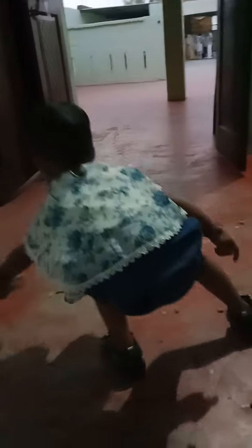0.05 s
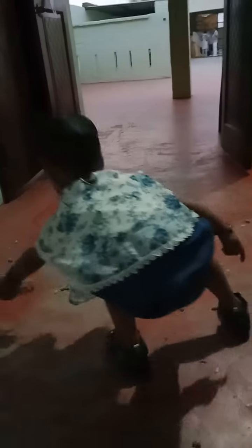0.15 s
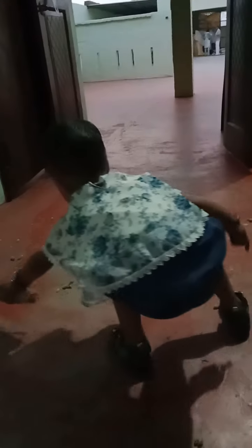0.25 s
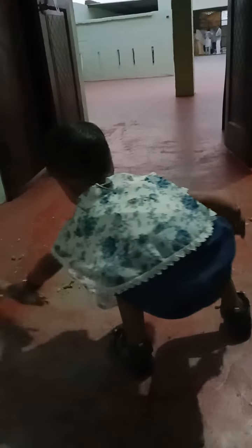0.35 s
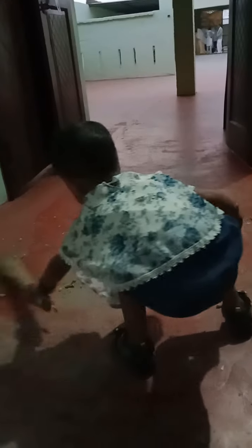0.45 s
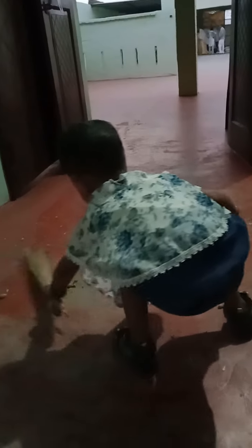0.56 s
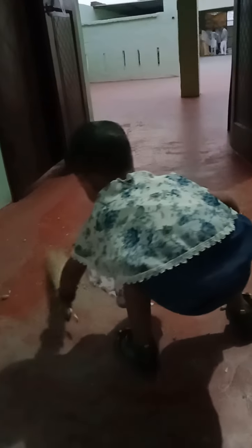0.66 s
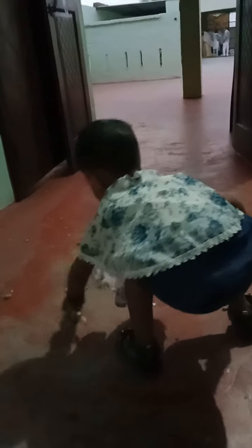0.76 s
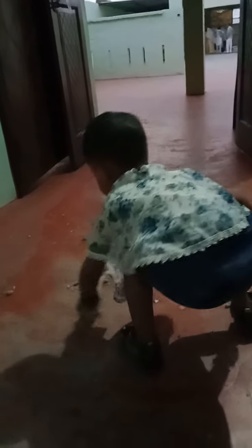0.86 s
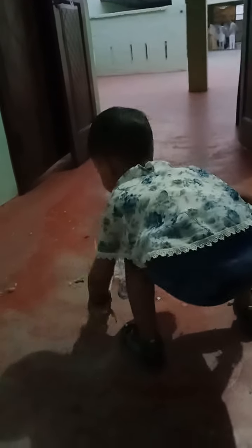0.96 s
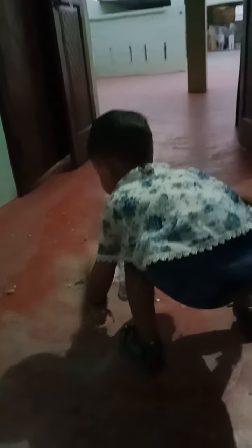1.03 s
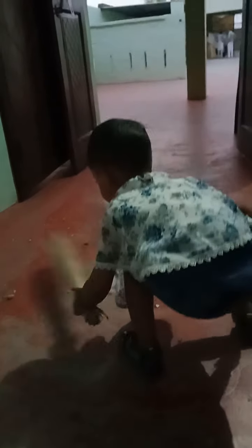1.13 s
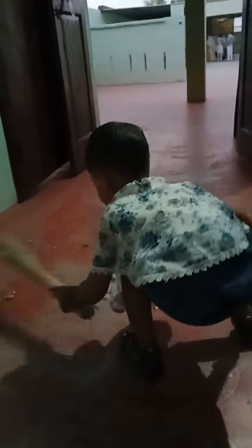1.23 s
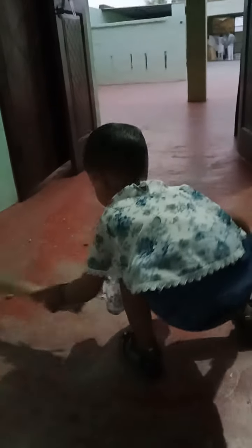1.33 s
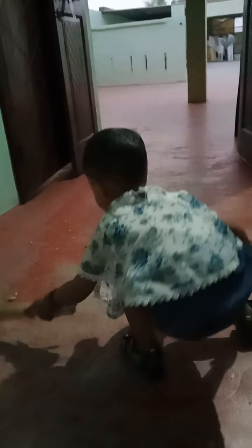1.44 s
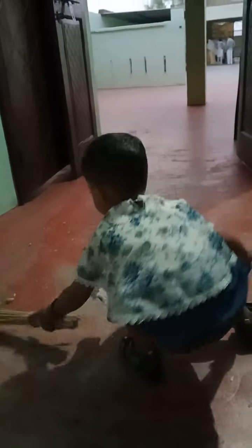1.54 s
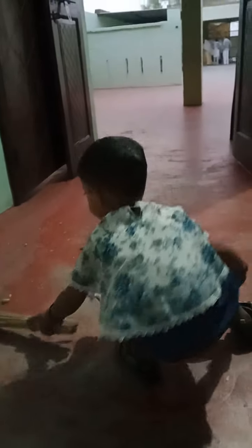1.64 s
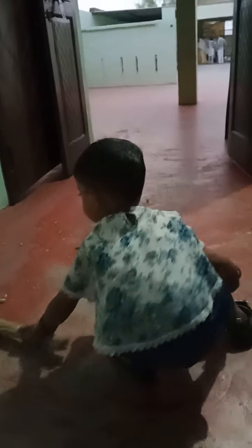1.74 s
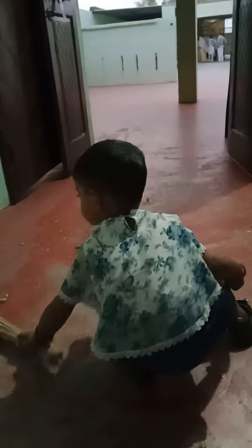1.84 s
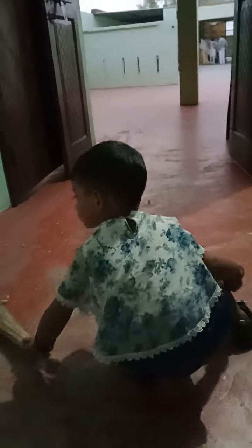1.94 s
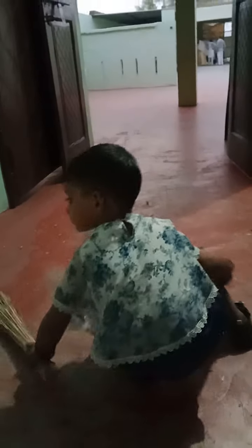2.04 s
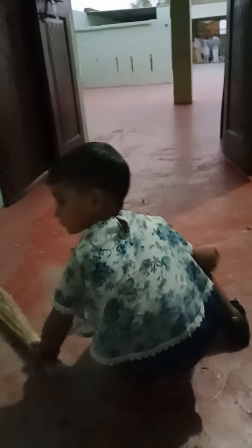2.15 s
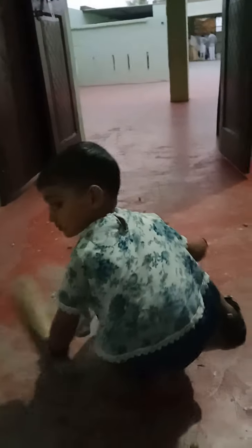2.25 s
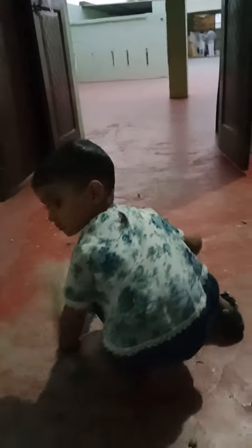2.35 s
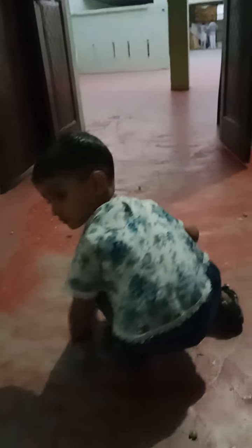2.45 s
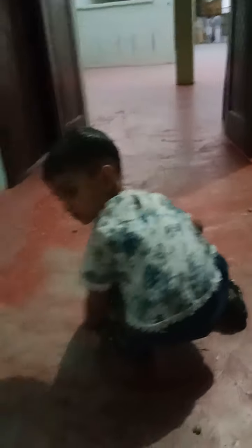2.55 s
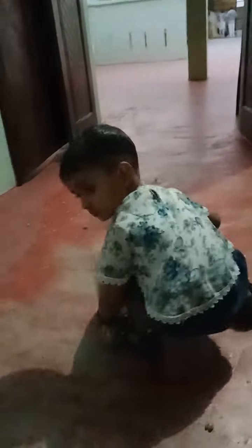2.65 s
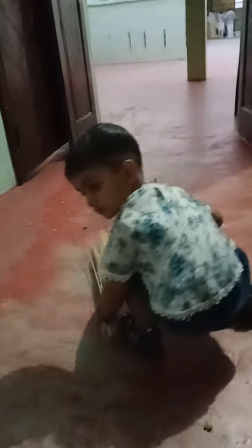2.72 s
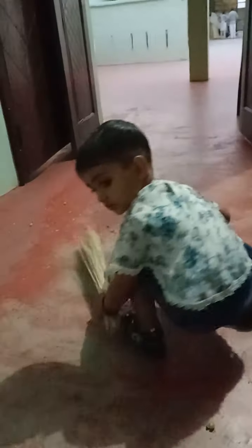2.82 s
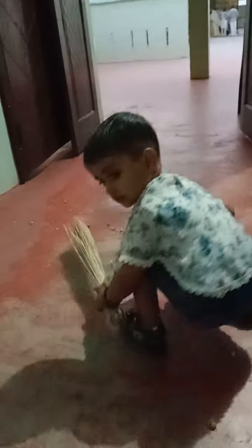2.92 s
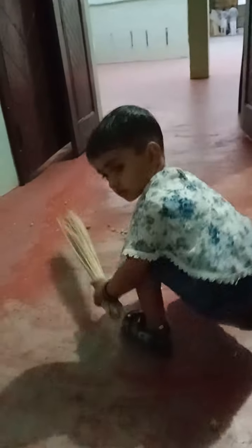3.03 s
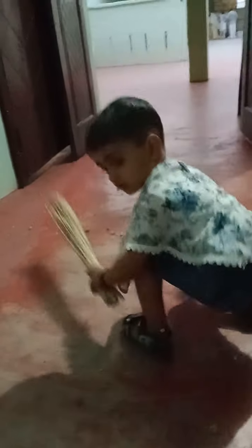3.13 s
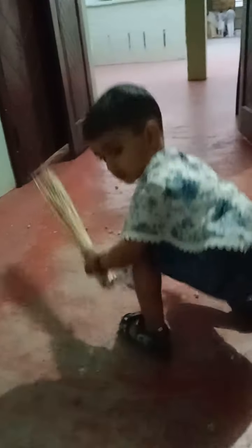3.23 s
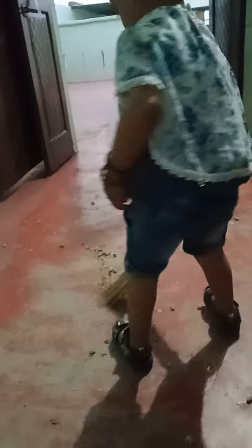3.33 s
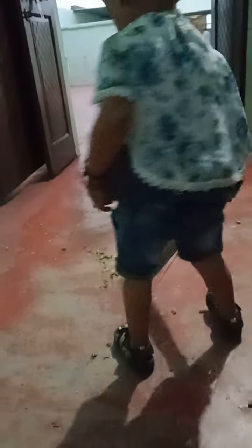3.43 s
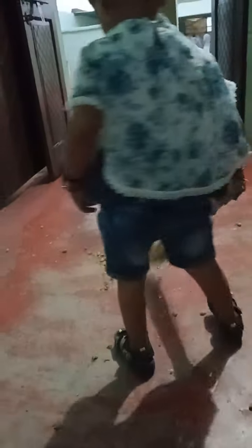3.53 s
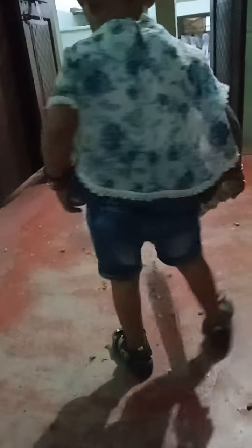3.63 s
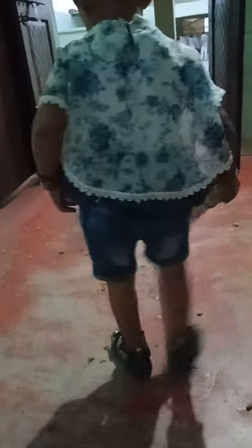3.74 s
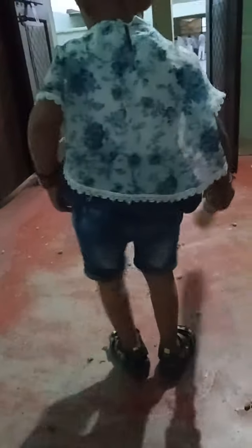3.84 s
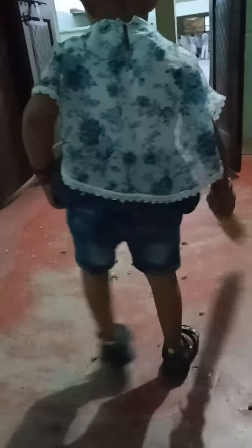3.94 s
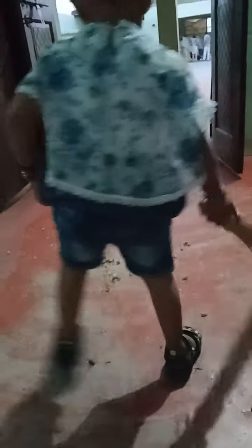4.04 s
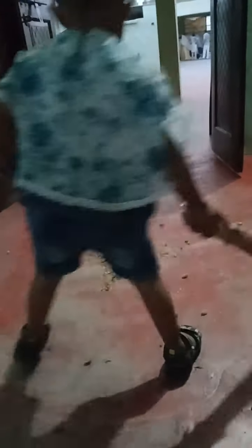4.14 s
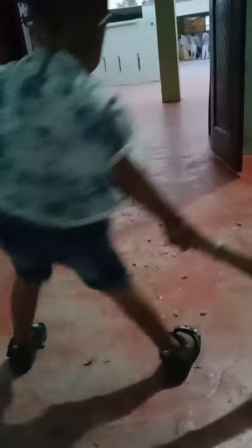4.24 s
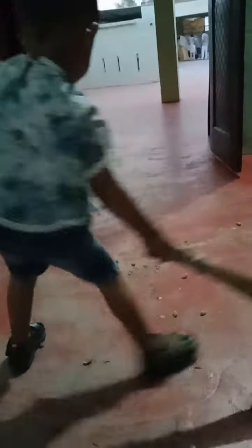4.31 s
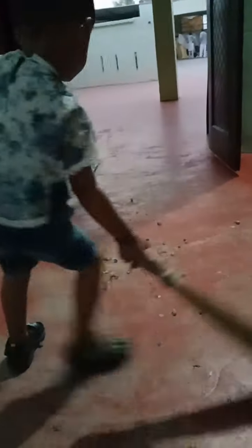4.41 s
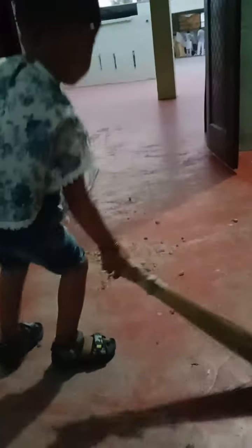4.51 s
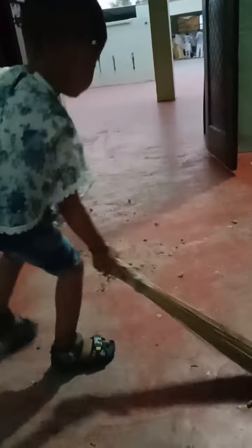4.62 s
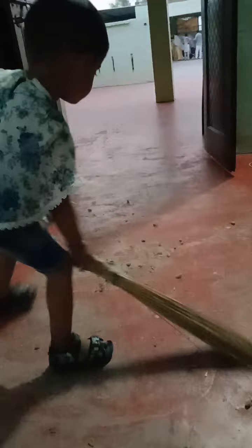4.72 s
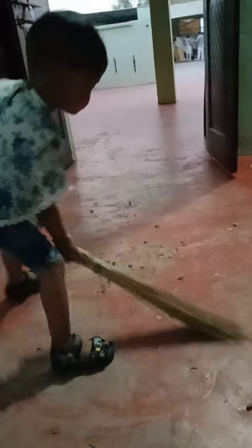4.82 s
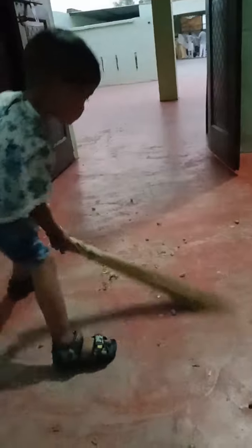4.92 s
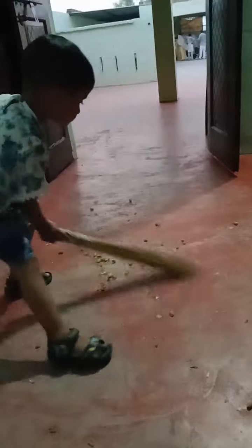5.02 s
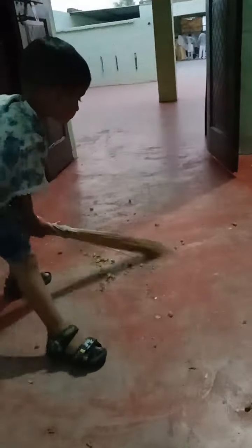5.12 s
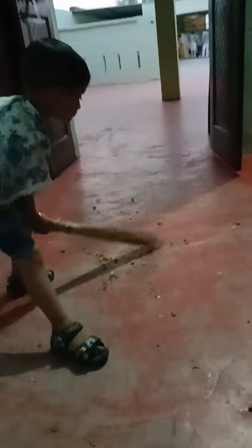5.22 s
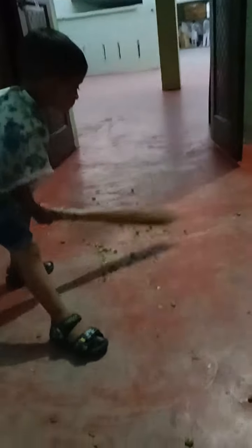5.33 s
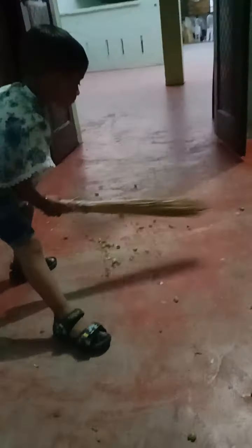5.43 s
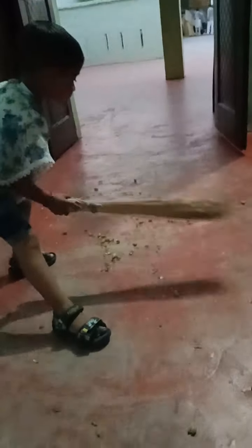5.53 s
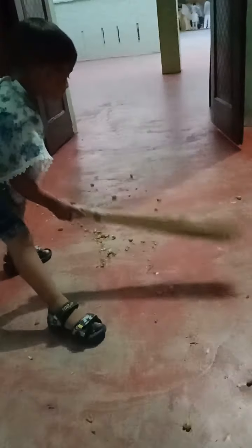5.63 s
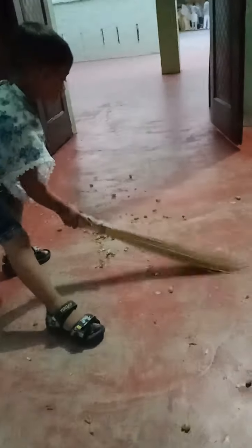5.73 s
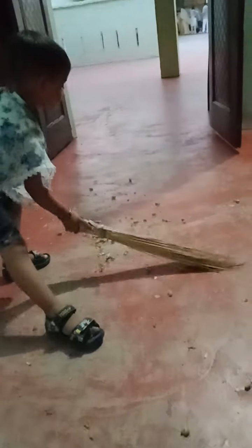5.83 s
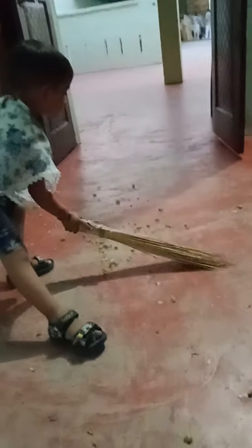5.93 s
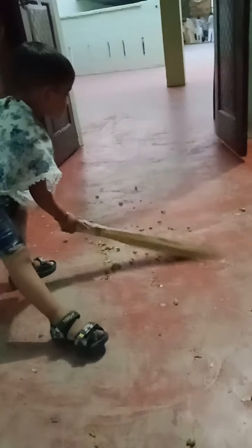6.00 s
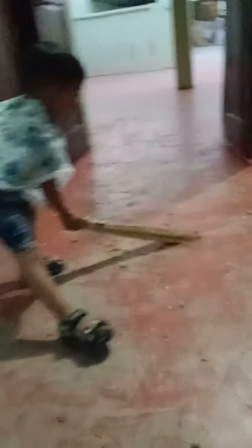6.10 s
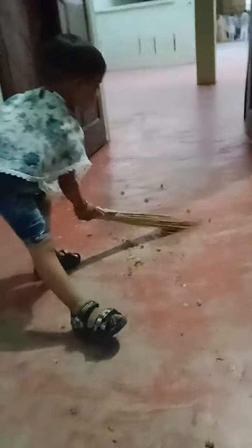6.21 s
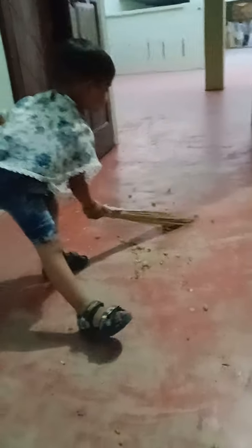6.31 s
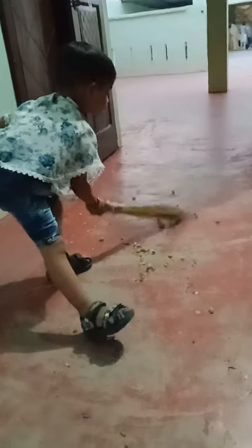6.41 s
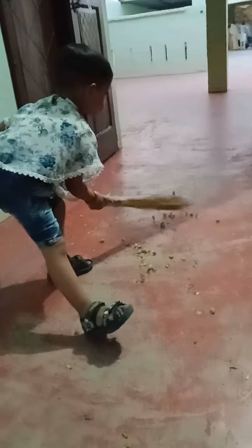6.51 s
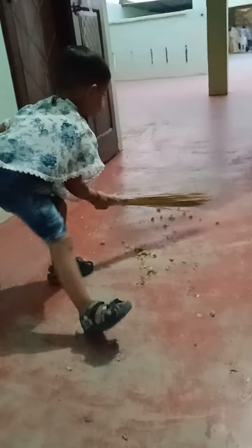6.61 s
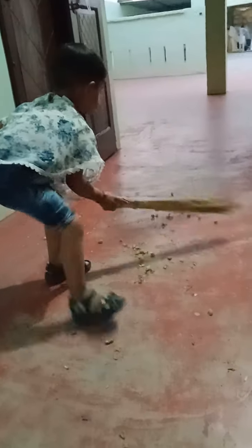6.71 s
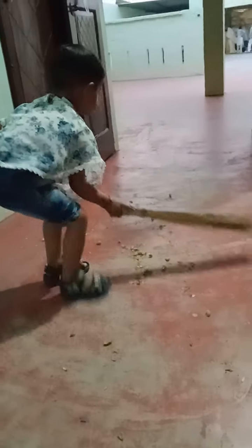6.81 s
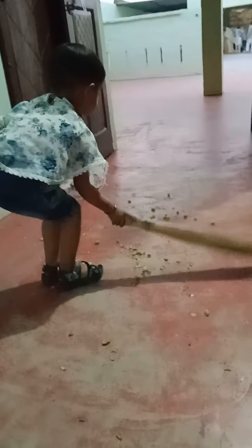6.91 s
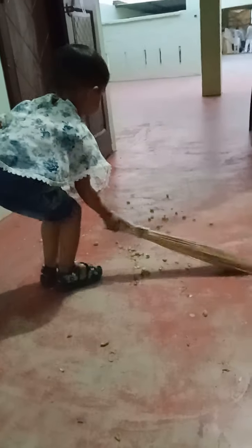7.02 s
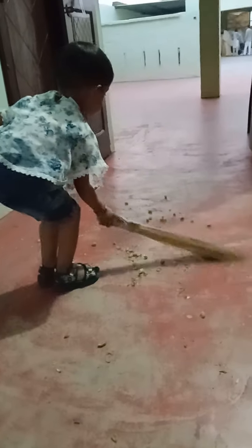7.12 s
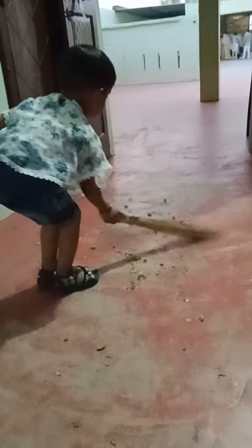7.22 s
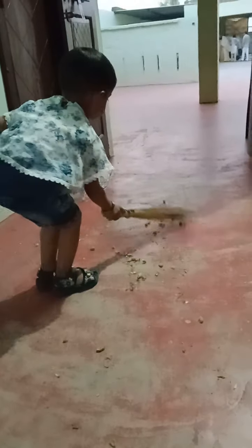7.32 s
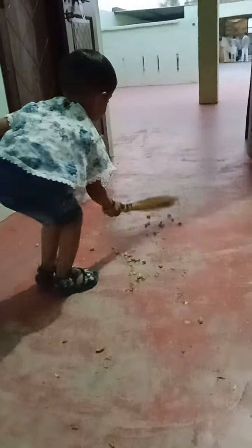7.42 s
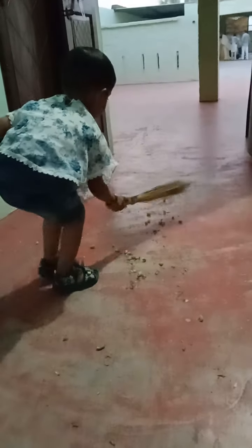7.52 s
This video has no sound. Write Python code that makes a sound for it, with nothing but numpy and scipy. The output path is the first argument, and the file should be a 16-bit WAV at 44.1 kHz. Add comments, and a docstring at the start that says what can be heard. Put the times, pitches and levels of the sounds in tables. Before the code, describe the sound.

Dry, bright broom strokes swish over a gritty hard floor close by, pausing midway, then resuming lighter, over faint hiss and soft low air thuds.

```python
"""A short grass broom sweeps a concrete floor, sandals scuff between the strokes; one phone microphone close by.
Broom: random clicks over a smooth rub, coloured by the stalks, with single loud snaps.
House drone: background noise in narrow bands, let through by a noise suppressor during strokes, level uneven.
Air on the microphone: low noise bands let through likewise, with separate thuds.
A thin steady hiss stays in the pauses.
"""
import sys
import numpy as np
from scipy import signal
from scipy.fft import rfft, irfft
from scipy.io import wavfile
from scipy.ndimage import uniform_filter1d

SR = 44100
rng = np.random.default_rng(int(sys.argv[2]) if len(sys.argv) > 2 else 0)


def waveform_to_disk(signal):
    """Save audio, clipped to [-1, 1], as 16-bit WAV at the path in sys.argv[1]."""
    frames = np.transpose(np.atleast_2d(signal))
    scaled = np.clip(frames, -1, 1) * 32767
    samples = np.round(scaled).astype(np.int16)
    wavfile.write(sys.argv[1], SR, samples)


N = 333396
HZ = np.arange(N // 2 + 1) * SR / N + 1e-9  # above zero for the logarithm


def undb(db):
    """dB to amplitude gain."""
    return 10 ** (np.asarray(db) / 20)


def unit(x):
    """Scale to rms 1."""
    return x / np.sqrt(np.mean(x ** 2))


def shape(points):
    """Gain over frequency, from (Hz, dB) points joined on a log frequency axis."""
    hz, db = np.transpose(points)
    return undb(np.interp(np.log(HZ), np.log(hz), db))


def colour(x, gain):
    """Filter by a gain over frequency."""
    return irfft(rfft(x) * gain, N)


def walk(rate_hz):
    """Random levels held for 1 / rate_hz and smoothed twice; spread near 1."""
    hold = int(SR / rate_hz)
    steps = np.repeat(rng.standard_normal(N // hold + 1), hold)
    return 0.64 * uniform_filter1d(uniform_filter1d(steps, hold), hold)[:N]


def patchy(x, depth_db, width_hz, hold_s):
    """Small regions of pitch and time swell and fade at random; depth may change in time; rms 1."""
    frame = 1024
    _, frame_s, spectrum = signal.stft(x, SR, nperseg=frame)
    field = rng.standard_normal(spectrum.shape)
    for axis, size in enumerate((width_hz * frame / SR, 2 * hold_s * SR / frame)):
        field = uniform_filter1d(field, max(int(size), 1), axis=axis)
    depth_db = np.interp(frame_s, np.arange(N) / SR, np.broadcast_to(depth_db, N))
    # the last term keeps the mean power whatever the depth
    gain = undb(depth_db * unit(field) - depth_db ** 2 * np.log(10) / 20)
    return unit(signal.istft(spectrum * gain, SR, nperseg=frame)[1][:N])


def patch_depth_db(level_db):
    """Noise suppression makes faint sound very patchy, firm sound less so."""
    return np.interp(level_db, (-68, -42), (7, 2.5))


def bands(modes, depth_db, width_hz, hold_s):
    """Noise in steep resonances (width to -6 dB), patchy in time and pitch; rms 1."""
    power = 0
    for hz, band_hz, db in modes:
        power = power + undb(2 * db) / band_hz / (1 + (2 * (HZ - hz) / band_hz) ** 2) ** 2
    noise = colour(rng.standard_normal(N), np.sqrt(power))
    return patchy(noise, depth_db, width_hz, hold_s)


def swells(peak_s, rise_s, fall_s, db):
    """Level in dB of overlapping swells, summed in power; rise and fall reach 20 dB below the peak."""
    swell_power = 1.5  # 1 = pointed peak, 2 = round
    grid = np.arange(0, N, 32)
    peak_s, rise_s, fall_s, db = (np.reshape(column, (-1, 1)) for column in (peak_s, rise_s, fall_s, db))
    late_s = grid / SR - peak_s
    far = np.where(late_s < 0, -late_s / rise_s, late_s / fall_s)
    power = np.sum(undb(2 * (db - 20 * far ** swell_power)), axis=0)
    return np.interp(np.arange(N), grid, 10 * np.log10(power + 1e-12))


def sum_gain(first_db, second_db):
    """Gain of two levels added in power."""
    return np.hypot(undb(first_db), undb(second_db))


def opening_db(stroke_offset_db):
    """Broom level that opens the noise suppressor: each stroke offset, power smoothed twice."""
    peak_s, rise_s, fall_s, db = np.transpose(STROKES)[:4]
    k = int(0.045 * SR)
    power = undb(2 * swells(peak_s, rise_s, fall_s, db + stroke_offset_db))
    power = uniform_filter1d(uniform_filter1d(power, k), k)
    return 10 * np.log10(np.abs(power) + 1e-12)


# Background let through by the suppressor. Each row: opening broom level in dB,
# then the levels before waver in dB of the upper, lowest and main drone, deep air and upper air.
LET_THROUGH = [(-92, -67.5, -91, -69.5, -102, -95), (-63, -62.5, -81.5, -64.5, -93, -91),
               (-47.5, -51.5, -74, -55, -92, -80.5), (-31, -49.5, -73, -50, -89.5, -82)]


def passed_db(column, open_db, waver_db):
    """Level of one band group let through at an opening level, plus a slow random waver."""
    levels = np.transpose(LET_THROUGH)
    return np.interp(open_db, levels[0], levels[column]) + waver_db * walk(6)


# Hiss spectrum. Each row: frequency in Hz, relative density in dB per Hz.
HISS_SPECTRUM = [(60, -1.5), (250, 4.5), (600, -6), (3000, -23), (6100, -18), (6400, 0.5), (8900, -1.5),
                 (9400, -14), (10000, -8), (11000, -13), (12000, -28), (15500, -36)]


def hiss():
    """Steady coloured noise."""
    hiss_db = -76.5
    return undb(hiss_db) * unit(colour(rng.standard_normal(N), shape(HISS_SPECTRUM)))


# Air thuds. Each row: peak in seconds, rise and fall in seconds to -20 dB, deep and upper part in dB.
AIR_THUDS = [(.1, .07, .1, -72, -82), (.48, .08, .33, -61, -81), (.63, .26, 0.27, -60, -68),
             (.83, 0.37, 0.027, -70.5, -76), (1.87, .14, .07, -78, -85), (2.16, .05, 0.39, -56, -71),
             (2.5, .06, 0.087, -79, -80), (2.93, .1, 0.066, -95, -75), (3.22, .05, .15, -78, -82),
             (4.39, 0.18, 0.1, -56, -80), (5.96, .24, .13, -86, -79), (6.42, 0.15, .03, -68.5, -72),
             (6.57, 0.07, .26, -68, -84), (6.95, .19, 0.18, -66.5, -78), (7.25, 0.16, 0.26, -61.5, -71),
             (7.53, 0.19, 0.051, -68, -76)]
# Deep and upper air bands. Each row: centre in Hz, width in Hz, relative power in dB.
AIR_DEEP = [(65, 9, 0), (35, 30, -30)]
AIR_UPPER = [(116.6, 20, -1), (193, 90, -3)]


def air():
    """Air on the microphone: two low noise bands let through during strokes, with added thuds."""
    open_db = opening_db(np.transpose(STROKES)[6])
    *times, thud_deep_db, thud_upper_db = np.transpose(AIR_THUDS)
    deep_db = passed_db(4, open_db, waver_db=3)
    upper_db = passed_db(5, open_db, waver_db=3.03)
    deep = bands(AIR_DEEP, depth_db=4, width_hz=50, hold_s=.05)
    upper = bands(AIR_UPPER, depth_db=3, width_hz=50, hold_s=.05)
    return (sum_gain(deep_db, swells(*times, thud_deep_db)) * deep
            + sum_gain(upper_db, swells(*times, thud_upper_db)) * upper)


# Lowest, main and upper drone bands. Each row: centre in Hz, width in Hz, relative power in dB.
LOW_BANDS = [(304, 58, 0), (370.6, 26, -2)]
MAIN_BANDS = [(474.3, 38, -1), (516.7, 49, -3), (551.7, 54, -8)]
HIGH_BANDS = [(731, 26, -16.5), (865.4, 62, -3.5), (979, 230, -0.5), (1340, 550, -1.5), (1390, 97, -3.5),
              (1682, 108, -7.5), (2147, 450, -7.5), (2540, 400, -12), (3870, 1000, -17.5)]
# Brief rises of the lowest bands. Each row: peak in seconds, seconds to -20 dB on each side, level in dB.
LOW_RISES = [(0.055, .06, -55), (.19, 0.07, -57), (0.497, .09, -57), (0.752, .06, -56.5), (.93, .08, -60),
             (1.33, 0.16, -68), (1.87, 0.12, -53.5), (2.23, 0.11, -50.5), (2.62, 0.12, -63),
             (3.8, 0.2, -69), (4.42, 0.04, -51), (4.515, 0.11, -54.5), (4.934, 0.03, -54.5),
             (6.07, 0.04, -67.5), (6.235, 0.01, -51)]
# Brief dips of the main bands. Each row: centre in seconds, length in seconds to 1/e of the depth, depth in dB.
MAIN_DIPS = [(0.036, 0.072, -15), (0.393, .06, -14), (0.588, 0.029, -19), (0.8, 0.066, -22),
             (1.19, 0.13, -11), (1.655, .05, -3), (2.01, 0.029, -14), (2.573, 0.24, -20.5),
             (2.95, 0.083, -4), (3.138, 0.082, -20), (3.36, 0.047, -19), (3.865, 0.056, -18),
             (4.688, 0.066, -10), (5.115, 0.035, -21), (5.213, 0.037, -18), (5.378, 0.12, -29),
             (6.01, 0.043, -16), (6.236, 0.038, -16), (6.88, 0.061, -16)]


def drone():
    """Background drone in narrow bands, let through by a noise suppressor during strokes, with uneven level."""
    upper_offset_db, main_offset_db = np.transpose(STROKES)[6:8]
    upper_open_db, main_open_db = opening_db(upper_offset_db), opening_db(main_offset_db)
    high_db = passed_db(1, upper_open_db, waver_db=2)
    low_db = passed_db(2, main_open_db, waver_db=3)
    main_db = passed_db(3, main_open_db, waver_db=1.46)
    for at_s, length_s, depth_db in MAIN_DIPS:
        main_db = main_db + depth_db * np.exp(-(2 * (np.arange(N) / SR - at_s) / length_s) ** 2)
    rise_peak_s, side_s, rise_db = np.transpose(LOW_RISES)
    low_gain = sum_gain(low_db, swells(rise_peak_s, side_s, side_s, rise_db))
    high = bands(HIGH_BANDS, depth_db=patch_depth_db(high_db), width_hz=90, hold_s=.09)
    low = bands(LOW_BANDS, depth_db=3, width_hz=90, hold_s=.06)
    main = bands(MAIN_BANDS, depth_db=3.5, width_hz=90, hold_s=0.063)
    return undb(high_db) * high + low_gain * low + undb(main_db) * main


def slips(per_s, mean_extra_db, smooth):
    """Stalk tips let go at random moments with random force, over a smooth rub."""
    moment, sign, force = rng.random((N, 3)).T
    extra_db = -mean_extra_db * np.log(force + 1e-9)
    clicks = (moment < per_s / SR) * np.sign(sign - .5) * undb(extra_db)
    return unit(clicks) + smooth * rng.standard_normal(N)


# Stalk spectrum. Each row: frequency in Hz, relative density in dB per Hz.
STALK_SPECTRUM = [(880, -23), (1500, -14.5), (1820, -10.5), (3510, -7.5), (4440, -3), (5950, -6.5),
                  (7300, -1), (9330, -3), (10100, 2.5), (11400, 2.5), (12700, 2.5), (14400, 2.5),
                  (15400, 1)]
# Microphone port dips. Each row: centre in Hz, width in Hz to 1/e of the depth, depth in dB.
PORT_DIPS = [(9300, 410, -4), (11250, 900, -5), (13850, 1000, -6)]


def stalk_body():
    """Gain of the stalks over frequency, with the port dips."""
    body = shape(STALK_SPECTRUM)
    for hz, width_hz, db in PORT_DIPS:
        body = body * undb(db * np.exp(-(2 * (HZ - hz) / width_hz) ** 2))
    return body


# Single stalks that snap loudly. Each row: time in seconds, peak in dB.
LOUD_SNAPS = [(1.476, -33), (1.5744, -21), (1.5964, -24), (1.736, -32), (1.7574, -29), (3.7668, -43),
              (4.3794, -29), (5.1791, -32), (5.2194, -45), (5.7433, -35), (5.8745, -35), (6.9775, -35)]


def snaps(body):
    """Single impulses that ring with the stalk spectrum."""
    impulses = np.zeros(N)
    for at_s, db in LOUD_SNAPS:
        impulses[int(at_s * SR)] = undb(db)
    return colour(impulses, body / irfft(body, N).max())


# Broom pushes and sandal scuffs. Each row: peak in seconds, rise and fall in seconds to -20 dB, level in dB,
# shaft and flat stalks in dB re level, fine tips in dB re level, how far the stroke opens the suppressor
# for upper drone and air in dB re level, and for main and lowest drone in dB re level.
STROKES = [(0.018, 0.032, 0.14, -46.5, -2, 2, -2, 1), (0.11, 0.028, 0.11, -46.5, -3, -6, -1, 0),
           (0.254, 0.23, 0.25, -35, -5.5, 3.5, -2.5, -8), (0.497, 0.19, 0.15, -31.5, -6, 6, 9, 10),
           (0.752, 0.587, 0.22, -42.5, -6.5, 1, -4, 8), (0.961, 0.71, 0.024, -53.5, -13, 2.5, 0.0, 0.5),
           (1.03, 0.05, 0.15, -73, -4, -4.0, 1.5, -13), (1.43, 0.05, 0.05, -75.5, 7.5, -10.0, 0.0, 0),
           (1.483, 0.025, 0.031, -45, -7.5, 0, 5, 8.5), (1.599, 0.11, 0.048, -39, -7, 2, -2, -5),
           (1.781, 0.012, 0.166, -57, -11.5, -4, 0.0, -3), (1.847, 0.095, 0.45, -37.5, -4, 5, -4, 11),
           (1.98, 0.24, 0.154, -35, -9, 4.5, 16.5, 7), (2.298, 0.19, 0.175, -31.5, -6.5, 1.5, -2.5, -4),
           (2.431, 0.29, 0.15, -38.5, -4.5, -2.5, -0.5, 0), (2.695, 0.163, 0.18, -64.5, -8.5, -1, 10, 7),
           (2.988, 0.046, 0.174, -65.0, -2.5, -2, 1, -7), (3.174, 0.012, 0.34, -58.5, -7.5, 0.5, 7.5, 7.5),
           (3.375, 0.214, 0.15, -57, -8, -0.5, 1.5, 3), (3.67, 0.06, 0.06, -84.0, 9, -8.0, 0.0, -7),
           (3.777, 0.027, 0.099, -61.5, 4.5, -5.5, 1.5, -6), (4.14, 0.19, 0.147, -81, 2, -4, 3, 0),
           (4.348, 0.0144, 0.055, -46, -2, -17, 5, -4), (4.364, 0.068, 0.21, -41, -1, -6, -0.5, -8),
           (4.45, 0.14, 0.187, -45, -2, -1.5, 3.5, 12.5), (4.729, 0.085, 0.34, -51, -7.5, 2.5, 0.0, 4),
           (5.019, 0.26, 0.11, -39, -5.5, 4, 8.5, 6), (5.181, 0.457, 0.097, -54.5, 0, -4, 0.5, 7),
           (5.27, 0.1, 0.029, -69, -7, -8, 11, 13), (5.747, 0.014, 0.26, -49.5, -6, 1.5, -3, -7),
           (6.034, 0.2, 0.262, -40.0, -12, 3.5, 3.5, 8), (6.196, 0.218, 0.18, -39, -5.5, 3, -8, -11),
           (6.363, 0.31, 0.058, -45, -7.5, 4, 2.5, 7), (6.43, 0.1, 0.024, -62.5, -12, -4, 3, -12),
           (6.69, 0.157, 0.13, -67.5, -10, -8.5, 4, 7), (6.897, 0.061, 0.11, -55.5, 2, -3, -1.5, -6),
           (6.981, 0.021, 0.076, -48.5, -5.5, 0, 0.5, -3.5),
           (7.094, 0.076, 0.225, -46.0, -5.5, 1.5, -4, -6), (7.22, 0.17, 0.12, -38, -7.5, 1.5, 1.5, -13),
           (7.3, 0.12, 0.023, -45.5, -6.5, 5, 2, 7), (7.453, 0.6, 0.599, -69.5, -11, -7.5, 8.5, 9)]


def broom():
    """Slipping stalks in three ranges; pressure on the floor shivers along the stroke."""
    peak_s, rise_s, fall_s, db, flat_re_db, tips_re_db, *_ = np.transpose(STROKES)
    level_db = swells(peak_s, rise_s, fall_s, db)
    flat_db = swells(peak_s, rise_s, fall_s, db + flat_re_db)
    tips_db = swells(peak_s, rise_s, fall_s, db + tips_re_db)
    body = stalk_body()
    # steep borders: flat stalks, middle, fine tips
    below_middle, below_tips = (1 / (1 + (HZ / hz) ** 40) for hz in (6160, 9510))
    shiver_db = 1.9 * walk(45) + 0.82 * walk(150)
    rub = slips(per_s=4000, mean_extra_db=0.5, smooth=1.0) * undb(shiver_db)
    # the noise suppressor leaves the lower rub patchy in pitch and time, more so when faint
    flat = patchy(colour(rub, body * below_middle), patch_depth_db(level_db), width_hz=130, hold_s=.08)
    middle = patchy(colour(rub, body * (below_tips - below_middle)), depth_db=1.0, width_hz=400, hold_s=.04)
    tips = unit(colour(rub, body * (1 - below_tips)))
    tips_db = tips_db + 0.64 * walk(25)
    return undb(flat_db) * flat + undb(level_db) * middle + undb(tips_db) * tips + snaps(body)


def scene():
    """All sources at one microphone, sent to both channels."""
    return np.tile(hiss() + air() + drone() + broom(), (2, 1))


def record(dry):
    """The phone drops the deepest bass and cuts the top."""
    bottom_hz, top_hz = 47.05, 15480
    thin = signal.sosfilt(signal.butter(2, bottom_hz, "high", fs=SR, output="sos"), dry)
    return signal.sosfilt(signal.ellip(14, .2, 80, top_hz, fs=SR, output="sos"), thin)


dry = scene()
out = record(dry)
waveform_to_disk(out)
```